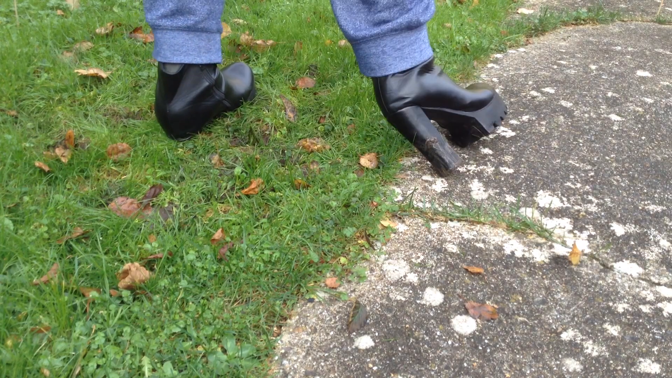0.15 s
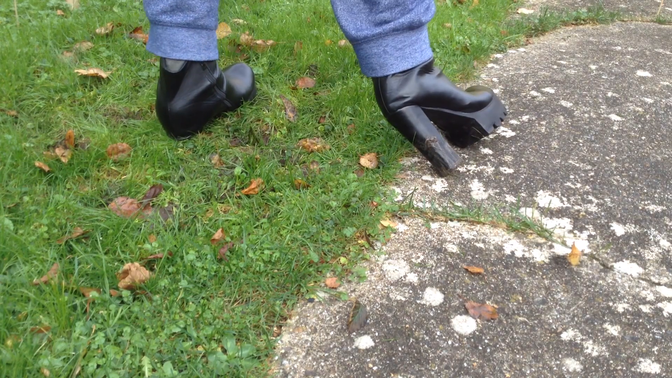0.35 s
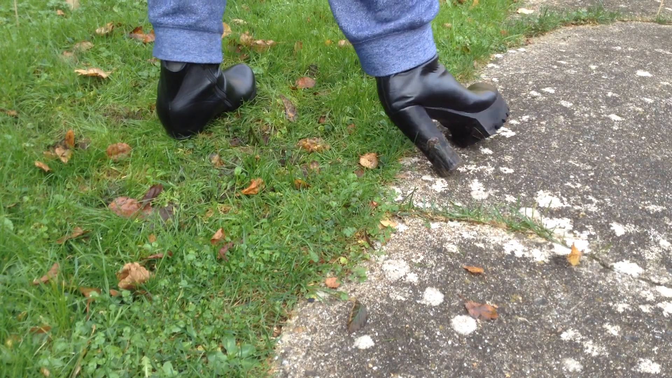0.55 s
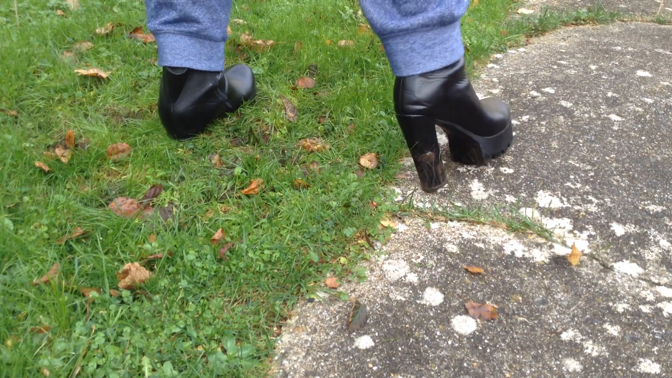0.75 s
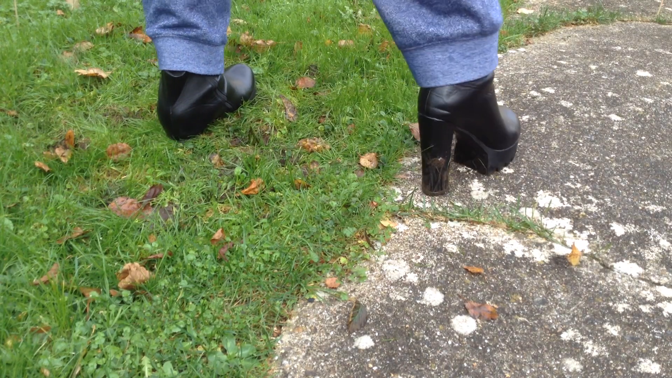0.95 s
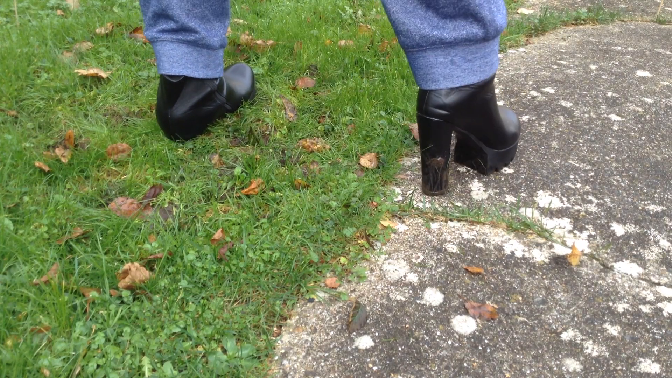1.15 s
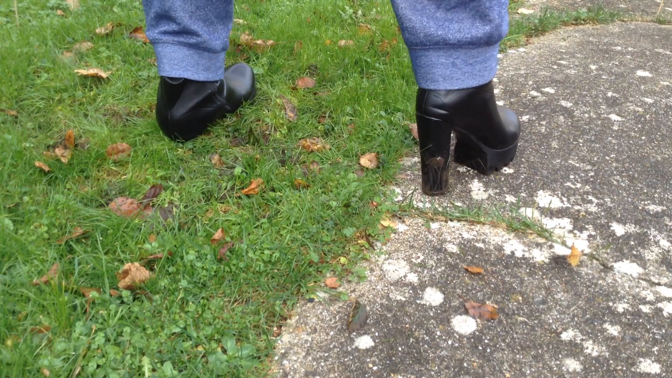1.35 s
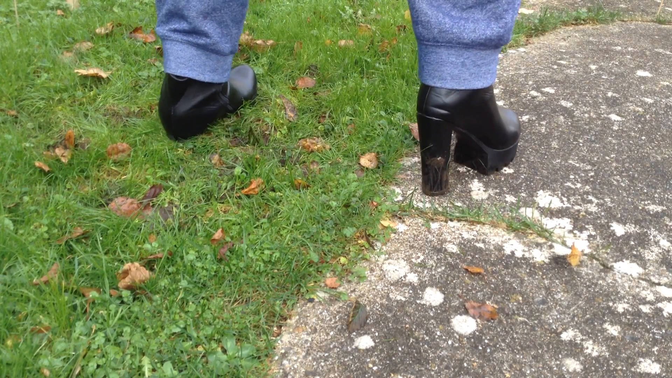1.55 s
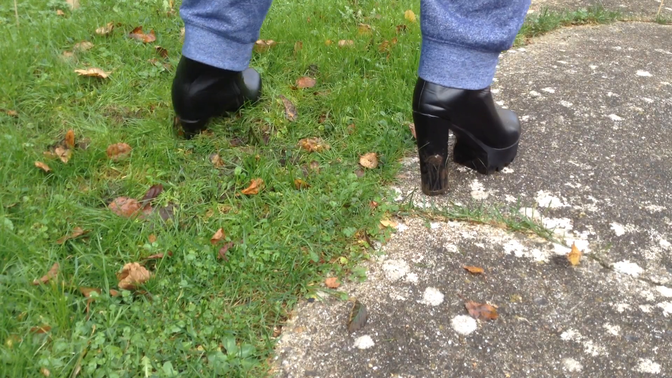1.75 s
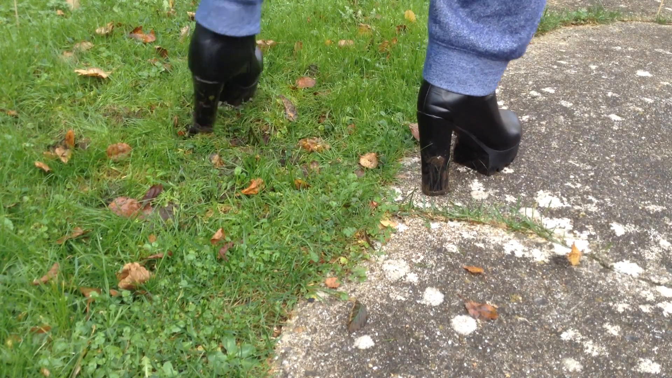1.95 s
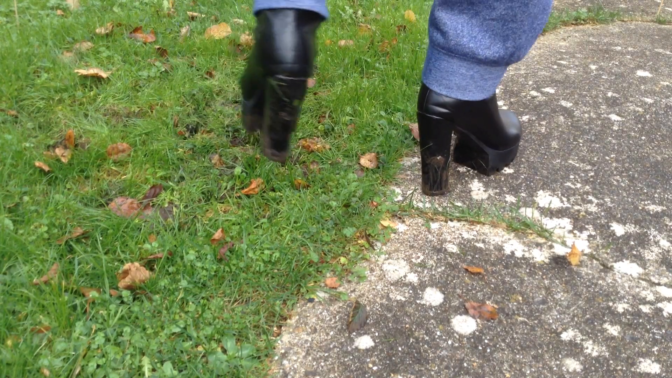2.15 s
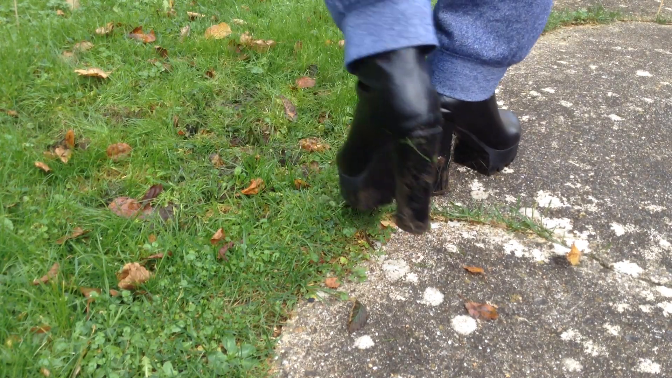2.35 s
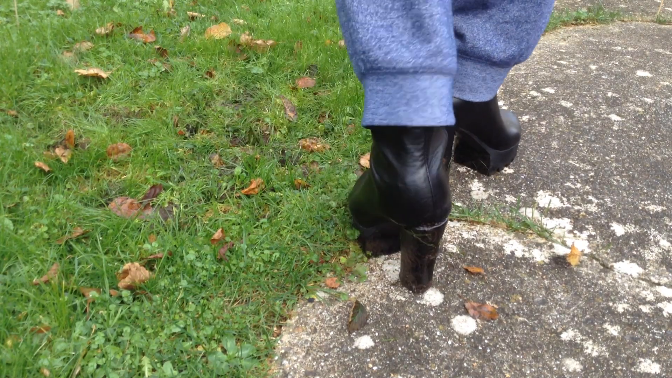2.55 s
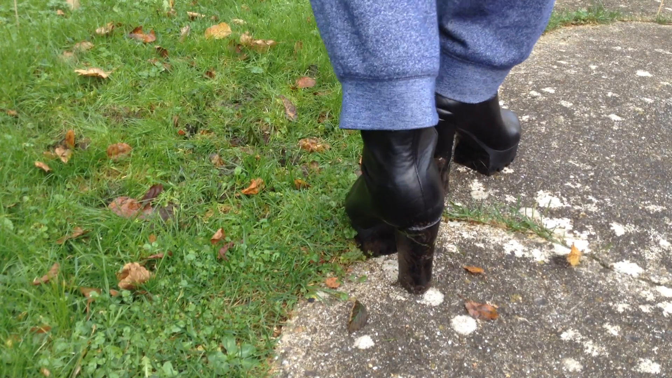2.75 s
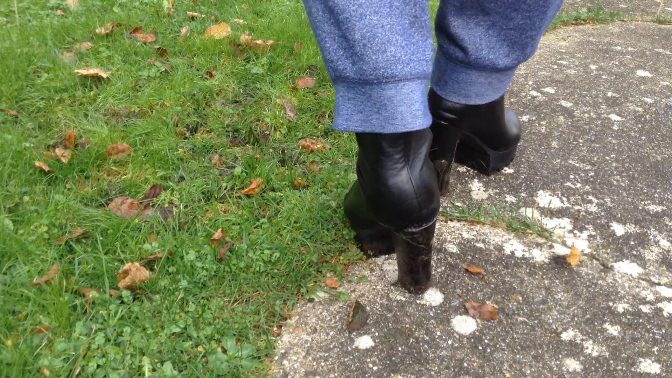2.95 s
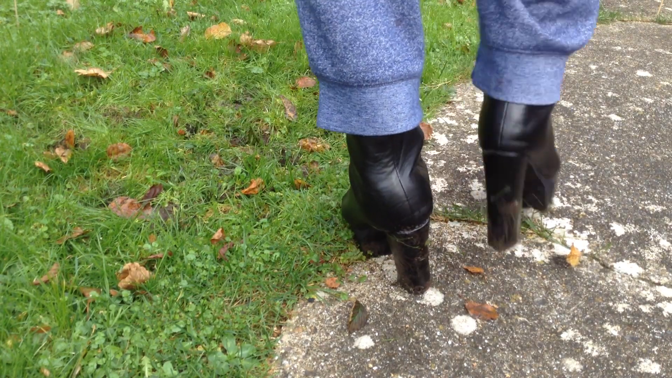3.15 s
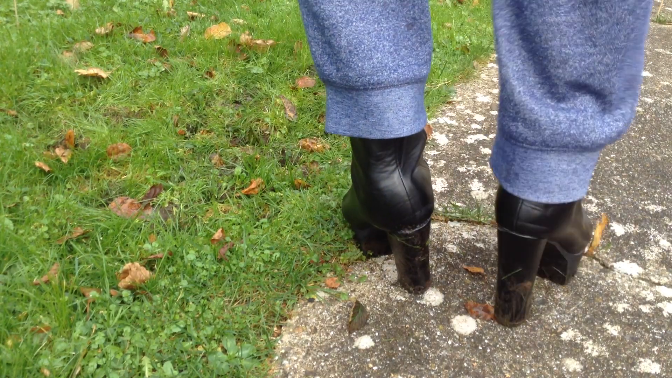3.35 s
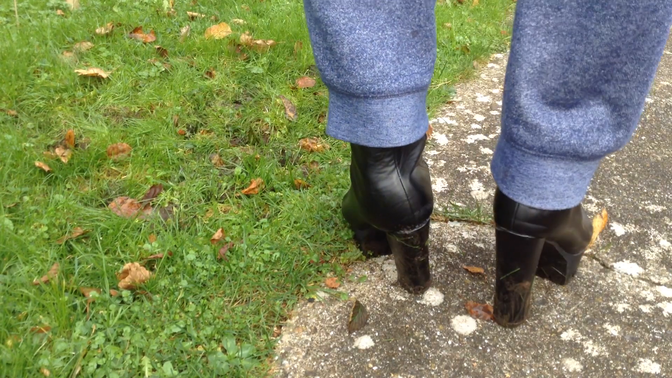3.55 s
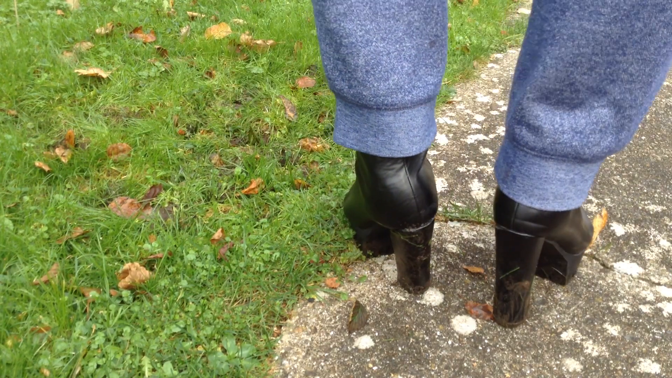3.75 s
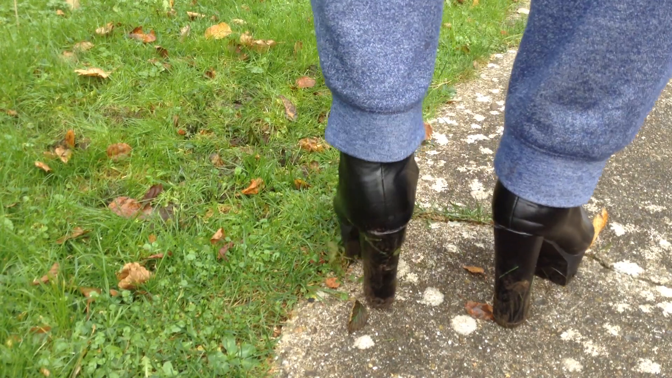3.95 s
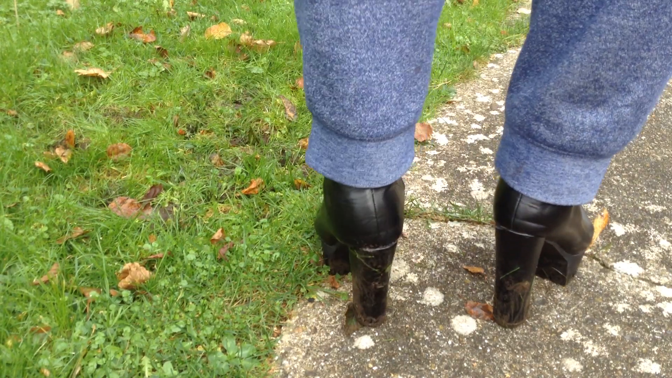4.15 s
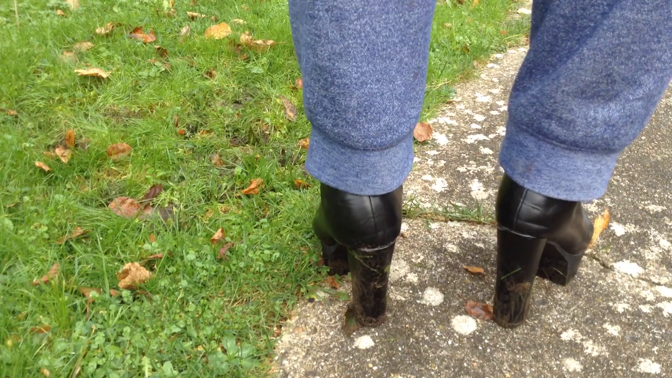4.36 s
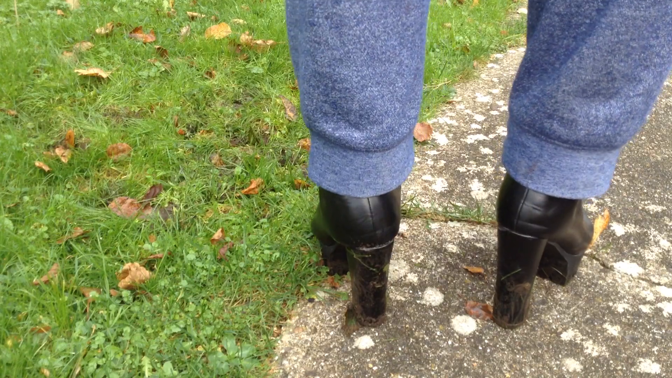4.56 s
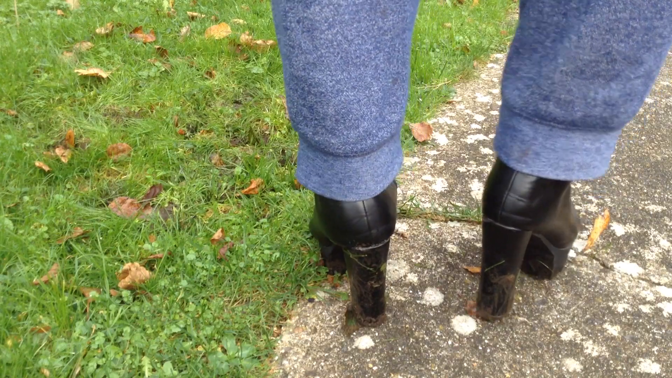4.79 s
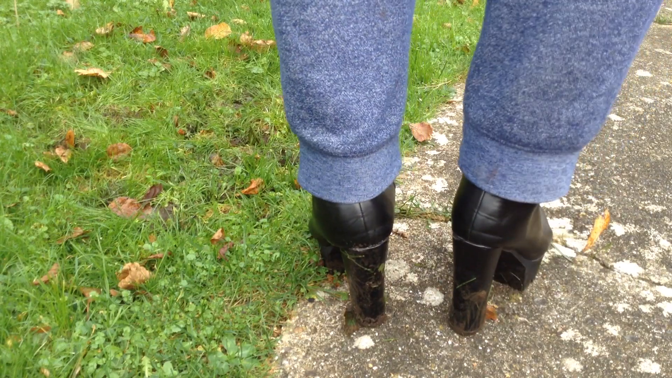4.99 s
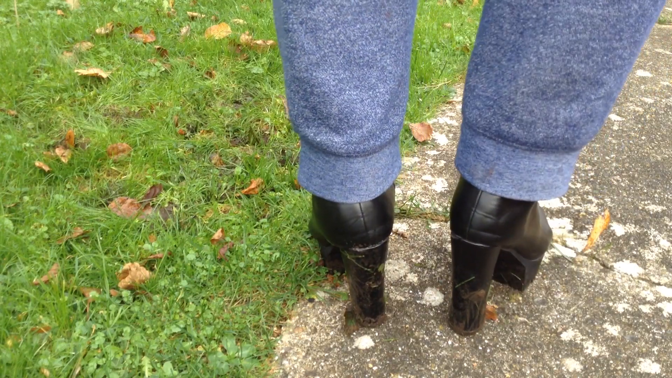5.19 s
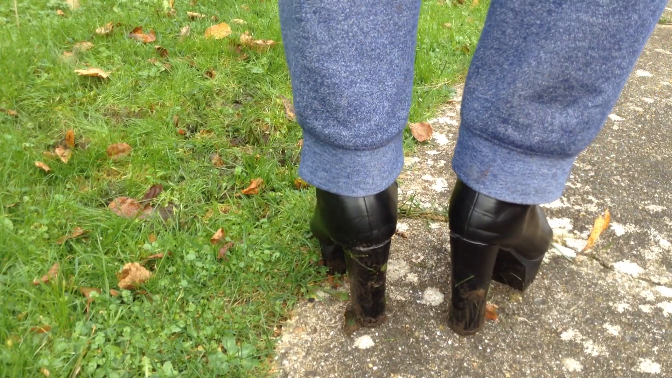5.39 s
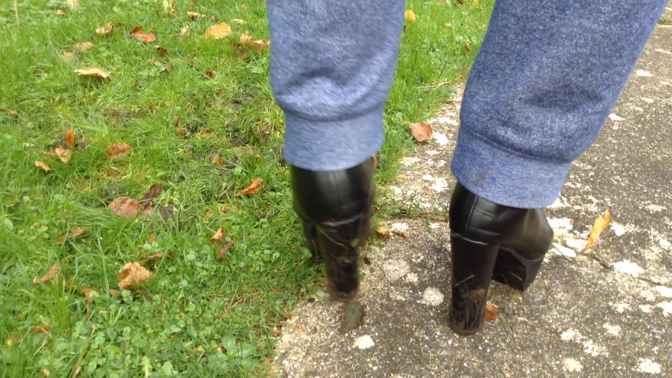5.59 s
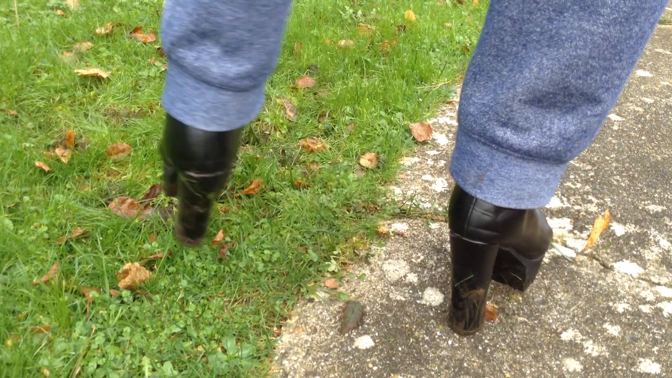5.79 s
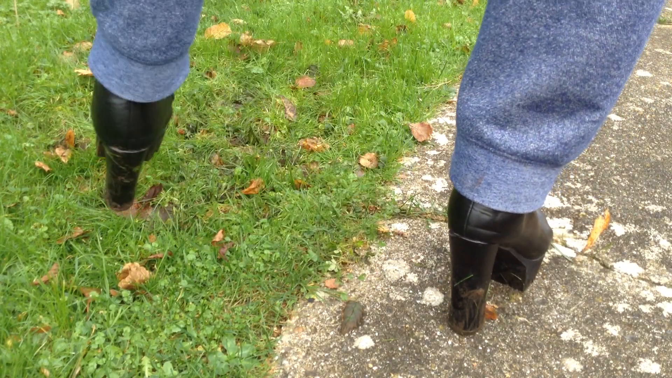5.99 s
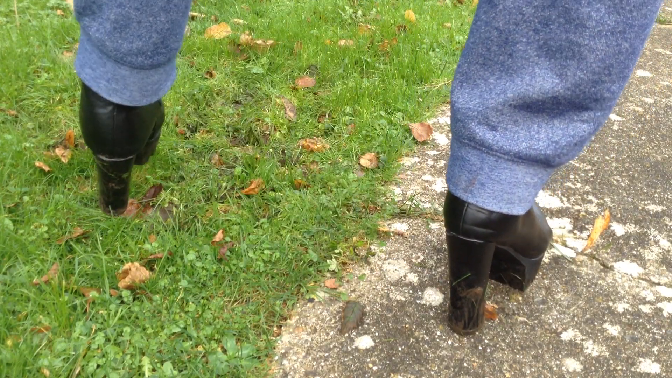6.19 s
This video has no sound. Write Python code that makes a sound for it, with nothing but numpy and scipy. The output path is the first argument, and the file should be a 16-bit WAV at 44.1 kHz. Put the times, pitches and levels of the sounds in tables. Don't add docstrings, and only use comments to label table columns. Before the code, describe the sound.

A quiet outdoor garden, close microphone, with a steady low hum of far traffic and faint airy hiss. At 0.1 s a boot sole and heel knock firmly on concrete with a few tiny rebounds. Around 0.7-1.0 s there are a light grass brush, a duller sole tap with gritty crunch, and a soft heel touch. From 1.7 to 2.1 s only faint rustles, small taps and leaf ticks. A low puff of air from the swinging leg leads to a loud hard clack at 2.57 s, then a sharp gritty click at 2.82 s. Faint leaf crackles near 3.05 s; a solid sole knock at 3.35 s, a lighter tap at 3.6, and the sharpest double heel clack at 3.9 s with skipping grit. Smaller knocks follow at 4.2, 4.55 and 4.7 s, a scuff at 5.0 s, a faint tap at 5.5 s, then near stillness. Knocks carry a short wall echo.

```python
import sys
import numpy as np
from scipy import signal
from scipy.io import wavfile

SR = 44100
rng = np.random.default_rng(int(sys.argv[2]) if len(sys.argv) > 2 else 0)


def persist_wave(psi):
    counts = np.round(np.clip(psi, -1, 1) * 32767).astype(np.int16)
    wavfile.write(sys.argv[1], SR, np.atleast_2d(counts).T)


def elevation(decibels):
    levels = np.asarray(decibels, float)
    return 10 ** (levels / 20)


N = 274743


def rms_one(x):
    return x / np.sqrt(np.mean(x ** 2) + 1e-20)


def curve(rows, outside=None):
    t_s, value = np.transpose(rows)
    return np.interp(np.arange(N) / SR, t_s, value, outside, outside)


def at_hz(points, hz):
    points = np.array(points)
    return np.interp(np.log(hz), np.log(points[:, 0]), points[:, 1])


def drift(rate_hz):
    r = np.exp(-80 * np.pi * rate_hz / SR)
    slow = signal.lfilter([1], [1, -2 * r, r * r], rng.standard_normal(N // 40 + 2002))
    slow = rms_one(slow[2000:])
    return np.interp(np.arange(N) / 40, np.arange(len(slow)), slow)


def ring(x, hz, t60_s):
    r = elevation(-60 / (t60_s * SR))
    w = 2 * np.pi * hz / SR
    return signal.lfilter([0, np.sin(w)], [1, -2 * r * np.cos(w), r * r], x)


def cut(x, hz, kind, order=2):
    return signal.sosfilt(signal.butter(order, hz, kind, fs=SR, output="sos"), x)


def add(out, t_s, sound, db):
    i = round(t_s * SR)
    out[i:i + len(sound)] += elevation(db) * sound[:N - i]


def bands(white):
    edges_hz = 24 * 2 ** np.arange(0, 9.6, .5)
    return [(np.sqrt(low * high), cut(white[k % 2], [low, high], "band"))
            for k, (low, high) in enumerate(zip(edges_hz, edges_hz[1:]))]


def swell(t_s, db, rise_s, fall_s):
    t = np.arange(N) / SR - t_s
    return elevation(db - 20 * np.maximum(-t / rise_s, t / fall_s))


# t/s, peak level/dB, body f/Hz, t60/s, upper mode level/dB
HEEL_KNOCKS = [(0.0845, -24, 2120, 0.005, -17), (1.0055, -40, 900, 0.0069, -3),
               (1.8152, -36.5, 706, 0.0096, 0.5), (2.5714, -6, 800, 0.006, 1),
               (2.8169, -16.5, 846, 0.01, -4.5), (2.8176, -14.5, 2550, 0.014, -32),
               (2.8182, -17, 5260, 0.016, -30), (2.8335, -40, 700, 0.015, 22),
               (3.3580, -22, 764, 0.0094, 4), (3.5851, -24.5, 674, 0.0034, 0), (3.8399, -18, 640, 0.015, 4),
               (3.8916, -4.5, 624, 0.019, 11.5), (3.908, -21, 700, 0.0082, 9),
               (3.9247, -9.5, 730, 0.0035, 4.5), (4.186, -25, 420, 0.0086, 3),
               (4.5479, -25, 690, 0.014, 7.5), (4.7345, -40, 756, 0.0081, -25),
               (4.9043, -36.5, 623, 0.023, 15), (5.5115, -37, 532, 0.0053, -3.5),
               (2.5716, -17, 2540, 0.0081, -30), (2.8184, -11.5, 4020, 0.01, -28),
               (3.373, -36, 500, 0.03, -28), (3.5655, -40.5, 650, 0.013, -12),
               (3.8920, -8, 1700, 0.0083, -32)]
SOLE_KNOCKS = [(0.0836, -14, 363, 0.014, 7.5), (0.7229, -37, 194, 0.032, -1),
               (0.8191, -21, 314, 0.0061, 12), (0.8259, -28.5, 358, 0.033, -11),
               (0.913, -35, 225, 0.029, 2), (0.9293, -37, 336, 0.015, -27), (1.7288, -39, 170, 0.013, 6),
               (2.5869, -30, 170, 0.009, 7), (2.7962, -35, 197, 0.011, 6), (3.3517, -6, 530, 0.0065, -17),
               (4.1563, -15.5, 454, 0.0037, -15), (4.687, -43, 220, 0.011, 18),
               (5.003, -34.5, 170, 0.029, 0), (0.0843, -29, 1570, 0.0074, -30),
               (2.8174, -18.5, 1336, 0.021, -30), (3.5845, -39, 1880, 0.011, 0)]
PAD_TOUCHES = [(0.6947, -40, 290, 0.0095, -20), (0.8059, -25.5, 305, 0.0069, -25),
               (2.4, -48, 170, 0.044, -23), (2.449, -46, 170, 0.03, -17), (2.468, -43, 170, 0.029, -22),
               (2.503, -42, 400, 0.016, -30), (2.5458, -44, 186, 0.028, -23),
               (2.5607, -12, 298, 0.0042, -1.5), (3.0547, -42.5, 250, 0.012, 3),
               (3.3379, -34, 186, 0.01, -38), (4.55, -35, 197, 0.04, -32), (4.8056, -40, 252, 0.021, 9),
               (5.0235, -20.5, 300, 0.0057, 2), (5.0339, -34, 239, 0.011, 12)]


def knocks():
    out, t = np.zeros(N), np.arange(4096) / SR
    parts = [(HEEL_KNOCKS, 1107), (SOLE_KNOCKS, 1240), (PAD_TOUCHES, 714)]
    blows = [(*row, upper_hz) for rows, upper_hz in parts for row in rows]
    for t_s, peak_db, body_hz, t60_s, upper_db, upper_hz in blows:
        push = 0.057 * rng.standard_normal(4096) * np.exp(-t / 0.0049)
        push[0] += 1
        dull_hz = max(2.3 * body_hz, 1.35 * upper_hz * elevation(min(upper_db, 6) / 2))
        push = cut(push, dull_hz, "low", order=1)
        body = ring(push, body_hz, t60_s) - elevation(upper_db) * ring(push, upper_hz, 0.55 * t60_s)
        slab = elevation(-18.5) * ring(push, 224, 0.02)
        add(out, t_s, (body + slab) / np.abs(body).max(), peak_db)
    out = cut(out, 7100, "low")
    return cut(out, 190, "high", order=3)


# t/s, level/dB, tilt/dB per resonance, odd-even/dB, decay/ms
CRUSHED_GRIT = [(0.0831, -38.5, -2, 1, 1.32), (0.8182, -48.5, 2, 1, 1.4), (0.8195, -42.5, 2, 0, 3.4),
                (0.829, -50.5, -0.5, -10.5, 1.22), (1.0052, -46.5, 7.5, -5.5, 2.2),
                (1.812, -45, 3, 3.5, 3.7), (2.532, -58.5, -7, 2.5, 4.6), (2.5607, -33, 2.5, -7.5, 1.36),
                (2.57, -38, -0.5, 6.5, 2.4), (2.817, -27, -1, 1.5, 1.9), (2.8285, -52, 12, -4, 3.7),
                (3.3506, -29.5, -0.5, -3.5, 1.19), (3.358, -37, 3.5, -1, 3.5),
                (3.583, -37.5, 4.5, 2.5, 1.15), (3.8388, -38.5, 3.5, -3.5, 1.57),
                (3.8916, -33, -4, 10, 1.19), (3.9242, -28, 0, 0.5, 2), (3.9405, -50, -3, -8, 1),
                (4.156, -45, 2, 1.5, 0.91), (4.186, -35.5, 6.5, 5.5, 1.16), (4.5445, -44, 9, 4, 1.74),
                (4.5485, -41, 4.5, -3.5, 1.16), (4.9044, -43, 4.5, 2.5, 0.98), (5.5085, -44.5, 5.5, 0, 5.9)]
# t/s, level/dB, tilt/dB per resonance, odd-even/dB
GRINDING_GRIT = [(0.805, -52.5, 1.5, -4), (0.928, -62, 3.0, -7), (2.5213, -59, 1.0, 3), (2.555, -64, -2, 8),
                 (2.576, -50, 9, -2), (2.601, -52, 9, -2), (2.8, -59, -1, 7), (3.3623, -50, -0.5, 6),
                 (4.0641, -49, 4.5, 0), (4.256, -53.5, 8.5, 4.5), (4.689, -51.5, 1, -2),
                 (4.6993, -54.5, 3, 2), (4.735, -72, -8, 4), (4.996, -49, 3, 4), (5.003, -51, 10, -4),
                 (5.023, -57.5, 3, 10.5), (5.034, -53, 11, -2), (5.0397, -54, 9, -5)]
# t/s, level/dB, tilt/dB per resonance, odd-even/dB
SKIPPING_STONES = [
    (0.912, -50.5, 4, 0),
    (0.997, -56, -1.0, -3),
    (1.012, -54, 10, 5),
    (2.6181, -54, 11, -1),
    (2.812, -57, 10, -3),
    (3.8685, -50, 4, -2),
    (3.994, -58, 13.5, 2),
    (4.0414, -54.5, 7.5, 0),
    (5.0509, -58, 6, 1.0),
]
# t/s, level/dB, tilt/dB per resonance, odd-even/dB
LEAF_SNAPS = [(0.5944, -63.5, -1, 4), (0.723, -55.5, 2, -2), (0.952, -63, 1, 0), (1.6862, -66, 12, 0),
              (1.695, -65, 7, 0), (1.7300, -66.5, -7, -3), (1.779, -61, 8, -7), (1.895, -65, 1, 5.5),
              (1.94, -65, 0, -4), (2.012, -63, 3, -7), (2.0207, -67.0, 7, 0), (2.297, -64.5, 2, -7),
              (2.695, -67, 13, 1.5), (2.921, -65, 7, 2), (2.9891, -65, 4, 6), (2.9977, -64, 6, 9),
              (3.03, -62, 4.5, 6), (3.07, -63, 5.5, 8), (3.0796, -58.5, 7, 7), (3.0958, -65.0, 1.0, 2),
              (3.663, -66, 10, 0), (3.822, -66, 9, 0), (4.356, -70, -4, -9), (0.265, -68.5, -2, -2),
              (0.7, -63, 2, 7), (3.325, -64, 10, 0), (3.41, -67, 8, 0), (4.137, -65, -3, 0)]
# f/Hz, width/Hz
CRACK_RESONANCES = [(2700, 2200), (4500, 2940), (8000, 3000), (13500, 4200)]
CRACK_LEVELS_DB = [0.5, 1, -6, -14.5]


def cracks():
    out, t, k = np.zeros(N), np.arange(-256, 768) / SR, np.arange(4)
    grind_ms, stone_ms, leaf_ms = 2, 0.94, 1.3
    lead_ms, lead_db = 0.82, -21
    rows = [*CRUSHED_GRIT]
    rows += [(*row, grind_ms) for row in GRINDING_GRIT]
    rows += [(*row, stone_ms) for row in SKIPPING_STONES]
    rows += [(*row, leaf_ms) for row in LEAF_SNAPS]
    size = (len(rows), len(t))
    grains = rng.standard_normal(size) * elevation(0.68 * rng.exponential(1, size))
    lead = elevation(lead_db) * np.exp(-np.abs(1000 * t / lead_ms))
    for (t_s, level_db, tilt_db, odd_db, decay_ms), grain in zip(rows, grains):
        x = 1000 * t / decay_ms
        burst = grain * (lead + np.maximum(0, 1 - np.exp(-1.6 * x)) * np.exp(-np.abs(x)))
        burst[np.searchsorted(x, .4)] += 1.1 / decay_ms * np.sqrt(np.sum(burst ** 2))
        sign = (-1) ** k
        levels_db = level_db + np.array(CRACK_LEVELS_DB) + tilt_db * (k - k.mean()) + odd_db * sign
        for (hz, width_hz), db, phase in zip(CRACK_RESONANCES, levels_db, sign):
            part = cut(burst, [hz - width_hz / 2, hz + width_hz / 2], "band")
            add(out, t_s + t[0], phase * part / np.sqrt(np.sum(part ** 2) / 220), db)
    return out


# t/s, peak level/dB, f/Hz, t60/s
BOUNCES = [(0.084, -25, 1020, 0.0015), (0.0924, -34, 1300, .008), (0.097, -26.5, 1500, .006),
           (.098, -44, 3200, .005), (.104, -35, 1450, .005), (0.109, -36, 2000, .008),
           (.121, -39, 805, .012), (.127, -40, 400, .015), (1.745, -41, 1500, .006),
           (1.794, -52, 4000, .005), (1.876, -48, 2500, .005), (1.893, -43, 2500, .005),
           (2.532, -46, 7000, .003), (2.534, -31, 3100, .005), (2.571, -32, 2280, .005),
           (2.5715, -30, 7500, .004), (2.5867, -30, 1500, .008), (2.816, -20, 4500, .002),
           (2.8295, -32, 7500, .004), (2.833, -34, 4200, .012), (2.834, -36, 5300, .01),
           (2.834, -28, 1400, 0.014), (2.843, -40, 4100, .006), (2.849, -42, 4200, .006),
           (3.343, -30, 250, 0.022), (3.351, -22, 193, 0.05), (3.363, -35, 2800, .008),
           (3.362, -23, 850, 0.015), (3.374, -35, 424, 0.014), (3.391, -33.5, 450, 0.018),
           (3.8924, -10.5, 3100, 0.0053), (3.8914, -16, 7850, 0.0045), (3.9075, -32, 4200, .008),
           (3.9262, -20, 5030, .006), (3.9405, -40, 4800, .008), (3.94, -28, 1610, 0.0091),
           (3.949, -32, 1920, .008), (4.1868, -19.5, 1000, 0.016), (.0836, -20, 4440, 0.0079),
           (.8215, -31, 7900, 0.0091), (3.585, -28.5, 3020, 0.0046), (3.587, -36, 8500, .004),
           (3.598, -43, 8800, .01), (3.598, -45, 4400, .012), (4.1635, -44, 6000, .004),
           (4.193, -38, 6000, .004), (4.204, -38, 1080, .02), (4.5555, -43, 5500, .004),
           (4.905, -45, 1060, .012), (3.899, -30, 1900, .006)]
# t/s, peak level/dB, f/Hz, t60/s
MORE_BOUNCES = [(3.8915, -19, 2500, .004), (3.8925, -26, 3700, .007), (3.894, -37, 12500, .005),
                (3.925, -22, 8100, .003), (3.9245, -18, 2500, 0.0033), (3.839, -33, 3100, .004),
                (3.932, -28, 2100, .006), (3.908, -28, 1800, .006), (3.8995, -29, 1300, .007),
                (3.868, -39, 1100, .006), (3.955, -42, 5500, .005), (3.3635, -24, 870, .009),
                (3.3885, -39, 2600, .005), (3.3585, -40, 14000, .004), (3.359, -29, 5300, .004),
                (3.3665, -38, 4600, .005), (2.5612, -27, 4300, 0.0016), (2.505, -40, 200, .03),
                (2.8, -38, 170, .025), (2.614, -40, 1000, .015), (2.587, -34, 710, .012),
                (2.533, -44, 1100, .012), (4.18, -40, 470, .01), (4.1605, -27, 450, .012),
                (1.731, -48, 3700, .004), (.099, -37, 650, .008), (.1055, -36, 650, .008),
                (4.549, -44, 8100, .003), (4.2, -44, 2200, .004), (4.575, -44, 1200, .01),
                (5.2, -48, 4700, .008), (4.9965, -40, 1050, 0.0076), (5.034, -40, 2150, 0.014),
                (5.036, -38, 960, .015), (5.004, -46, 4500, .005), (2.6, -40, 1000, .008),
                (2.8175, -26, 8500, .003), (4.805, -50, 4000, .004), (4.397, -54, 4500, .004),
                (3.565, -52, 2900, .005), (3.84, -36, 5500, .004), (4.188, -28, 950, .008),
                (4.1565, -32, 1100, .004), (4.195, -40, 550, .008), (2.5715, -16, 1000, .006),
                (2.579, -30, 1100, .006), (3.3505, -26, 4700, .003), (2.874, -46, 4200, .04),
                (.0838, -24, 1700, .004), (2.856, -42, 4200, .04)]


def rebounds():
    out, t = np.zeros(N), np.arange(4096) / SR
    touch_ms = 0.17
    for t_s, peak_db, hz, t60_s in [*BOUNCES, *MORE_BOUNCES]:
        touch = (1 + rng.standard_normal(4096)) * np.exp(-1000 * t / touch_ms)
        body = ring(touch, hz, t60_s)
        add(out, t_s, body / np.abs(body).max(), peak_db)
    return cut(out, 167, "high", order=4)


# t/s of peak, level/dB, rise/s, fall/s, top f/Hz
LITTER = [(.098, -48, .015, 0.06, 2320), (.825, -38.5, .02, 0.042, 1500), (2.59, -43, .02, 0.05, 1500),
          (2.84, -50.5, .02, 0.071, 1610), (3.375, -40, 0.017, 0.049, 655),
          (3.935, -38.5, 0.027, 0.075, 2200), (4.2, -49.5, 0.022, 0.048, 1200),
          (5.03, -41.5, 0.04, 0.034, 1180), (3.965, -48, .02, .06, 2100), (.125, -54, .02, .05, 2300),
          (2.615, -49, .025, .04, 1500), (3.912, -42, .015, .015, 2400)]


def settles():
    crumbs_per_s = 2500
    crumbs = rng.standard_normal(N) * (rng.random(N) < crumbs_per_s / SR) * elevation(2.4 * drift(63))
    return sum(swell(t_s, db, rise_s, fall_s) * rms_one(cut(crumbs, [280, top_hz], "band"))
               for t_s, db, rise_s, fall_s, top_hz in LITTER)


# t/s of peak, level/dB, rise/s, fall/s, extra top/dB
GRASS_BRUSHES = [
    (.715, -59, .15, 0.044, 1),
    (1.7, -68.5, 0.23, 0.46, -3),
    (1.838, -60, .04, 0.082, 1),
    (1.99, -63, 0.58, 0.055, 5),
    (3.09, -70, .3, .03, 9),
    (3.68, -63.5, 0.081, .04, 1),
    (4.09, -64, .25, 0.29, -6),
]
# t/s of peak, level/dB, rise/s, fall/s, extra top/dB
GRIT_GRATES = [(.84, -57, 0.036, .035, -5), (1.0, -67, 0.18, .05, -2), (2.58, -57.5, 0.057, 0.072, 13),
               (2.626, -55, .04, 0.035, -2), (2.836, -49, 0.022, 0.055, -10), (2.803, -55, .01, 0.03, 3),
               (3.6, -56, .01, .03, 0), (3.95, -47, 0.053, 0.033, -15), (4.205, -54, 0.043, 0.092, -9),
               (4.56, -57, .02, .05, -10), (4.7, -54.5, 0.014, 0.042, -2), (5.0, -58, 0.004, .04, 5),
               (5.045, -54.5, 0.044, 0.042, 8.5), (3.8905, -48, .005, .003, 0), (3.913, -52, .02, .02, -10),
               (2.87, -63, .04, .08, -6), (3.355, -48, .004, .006, -3), (3.375, -54, .015, .06, -8),
               (2.567, -48, .006, .005, -3), (.091, -54, .006, .02, -8), (3.856, -60, .012, .02, -10)]
# f/Hz, density level/dB per Hz
RUSTLE_SPECTRUM = [(1000, -20), (2000, -20), (4500, 8), (8000, -0.5), (11000, -3), (14500, -3.5)]


def rustle():
    born = rng.random((2, N)) < 4000 * elevation(4 * drift(50)) / SR
    snaps = rng.standard_normal((2, N)) * elevation(2.5 * rng.exponential(1, (2, N))) * born
    sound = sum(elevation(at_hz(RUSTLE_SPECTRUM, hz)) * b for hz, b in bands(snaps + 1e-18) if hz > 1000)
    sound = rms_one(sound)
    top = cut(sound, 7200, "high")
    return sum(swell(t_s, db, rise_s, fall_s) * (sound - top + elevation(top_db) * top)
               for t_s, db, rise_s, fall_s, top_db in [*GRASS_BRUSHES, *GRIT_GRATES])


# t/s, level/dB
LEG_GUST = [
    (2.37, -90),
    (2.4, -59),
    (2.5, -57),
    (2.56, -48),
    (2.62, -90),
]


def gust():
    lumps = cut(rng.standard_normal(N), [80, 220], "band") * elevation(4.1 * drift(30))
    return elevation(curve(LEG_GUST, -120)) * rms_one(lumps)


# f/Hz, t60/s
TAIL_T60 = [(200, 0.19), (700, 0.32), (2000, 0.25), (5000, 0.17), (12000, 0.14)]
# f/Hz, level/dB
TAIL_LEVEL = [(200, -1), (420, -15), (700, -13.5), (2000, -12), (5000, -5), (12000, -4)]
# t/s, level/dB
WALL_ECHOES = [
    (.0085, -43),
    (.015, -29),
    (0.022, -26.5),
]


def garden(x):
    t, tail = np.arange(SR // 2) / SR, 0
    for hz, b in bands(rng.standard_normal((2, len(t)))):
        if hz > 140:
            t60_s = at_hz(TAIL_T60, hz)
            tail = tail + elevation(at_hz(TAIL_LEVEL, hz) - 60 * t / t60_s) * b / np.sqrt(t60_s)
    tail = 0.007 * tail * (1 - np.exp(-t / 0.00091))
    for t_s, db in WALL_ECHOES:
        scatter = rng.standard_normal(88) * np.hanning(88)
        add(tail, t_s, cut(scatter / np.sqrt(33), 3600, "low"), db)
    return signal.fftconvolve(x, tail)[:N]


# t/s, level/dB
TRAFFIC_LEVEL = [
    (0.0, -54),
    (0.43, -56.5),
    (0.83, -52.5),
    (1.13, -55.5),
    (2.44, -56.5),
    (2.55, -53.5),
    (4.29, -58.5),
    (6.23, -57.5),
]
# f/Hz, density level/dB per Hz
AIR_SPECTRUM = [(15, -73), (40, -46), (106, -22), (150, 2), (243, 1), (354, -5.5), (462, -11.5),
                (515, -9.5), (903, -8.5), (1540, -13.5), (1670, -16.5), (3930, -16), (5570, -22.5),
                (15000, -29)]


def far():
    traffic_db = curve(TRAFFIC_LEVEL)
    swing_db, together = traffic_db - traffic_db.mean(), drift(2.9)
    layers = [(-72.5 + 1.2 * drift(1.9), 0, 130),
              (-60.5 + 0.71 * swing_db, 130, 400),
              (-60.5 + 0.45 * swing_db, 400, 2000),
              (-65 + 0.22 * swing_db, 2000, SR)]
    parts = []
    for hz, b in bands(rng.standard_normal((2, N))):
        wander_db = .4 * together + 1.2 * drift(11) + 1.1 * drift(1.2)
        wander_db = wander_db * min(1, 2500 / hz)
        parts.append((hz, elevation(at_hz(AIR_SPECTRUM, hz) + wander_db) * b))
    return sum(elevation(db + 2) * rms_one(sum(b for hz, b in parts if low_hz < hz < high_hz))
               for db, low_hz, high_hz in layers)


def scene():
    boots = knocks() + cracks()
    return (boots + garden(boots) + rustle() + far() + gust() + settles() + rebounds())[None]


def band_limit(x):
    return signal.sosfilt(signal.butter(12, 16480, fs=SR, output="sos"), x)


def record(dry):
    rounded = 1.401 * np.tanh(dry / 1.803)
    rolloff = signal.cheby2(10, 26, 15550, fs=SR, output="sos")
    mix = signal.sosfilt(rolloff, rounded)
    return band_limit(mix)


dry = scene()
out = record(dry)
persist_wave(out)
```